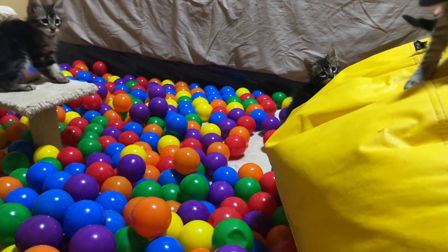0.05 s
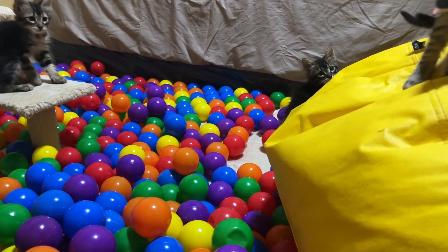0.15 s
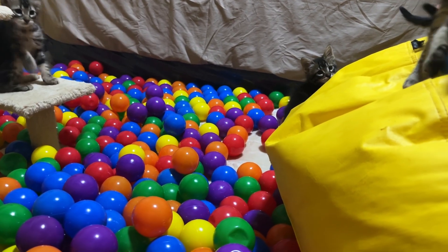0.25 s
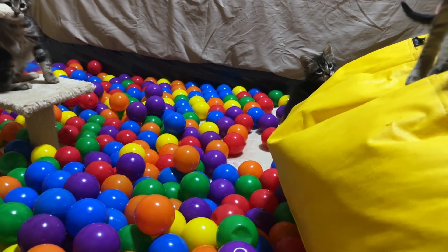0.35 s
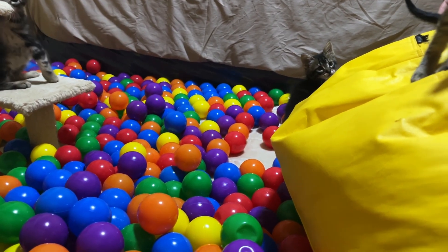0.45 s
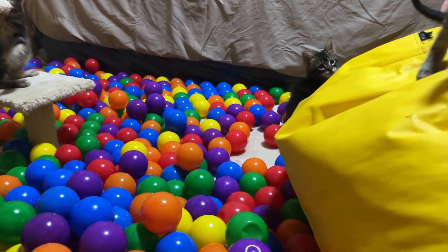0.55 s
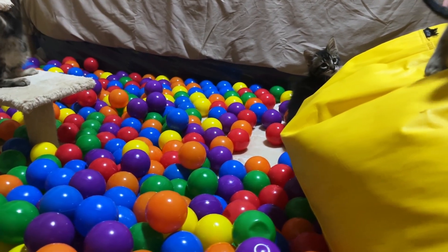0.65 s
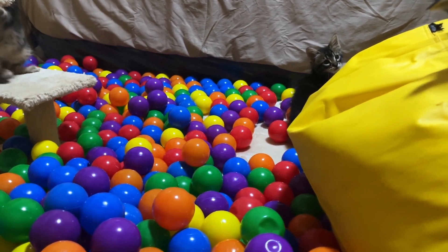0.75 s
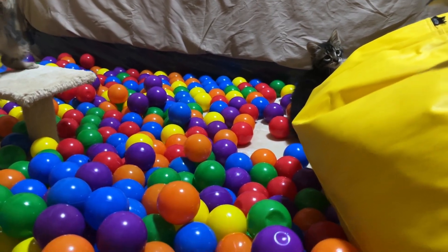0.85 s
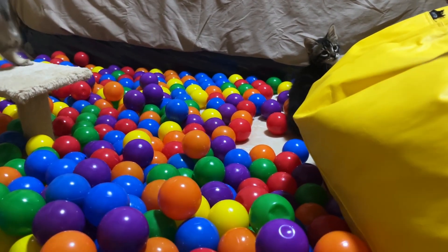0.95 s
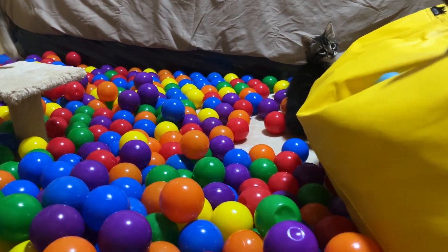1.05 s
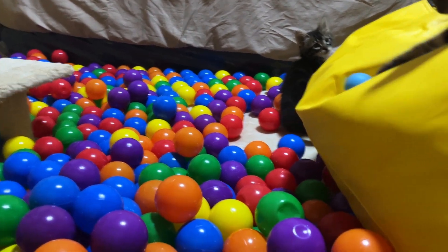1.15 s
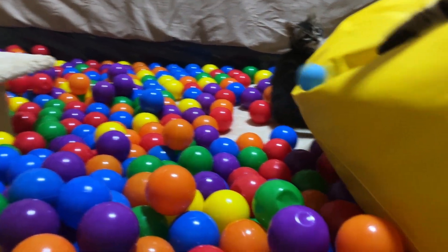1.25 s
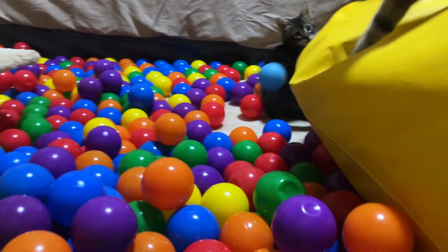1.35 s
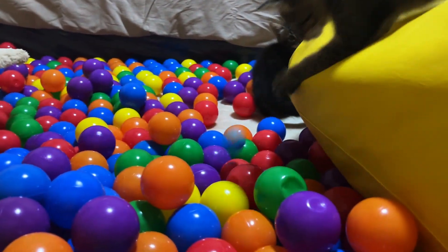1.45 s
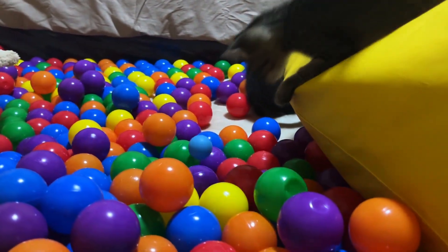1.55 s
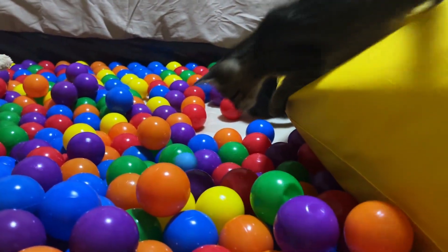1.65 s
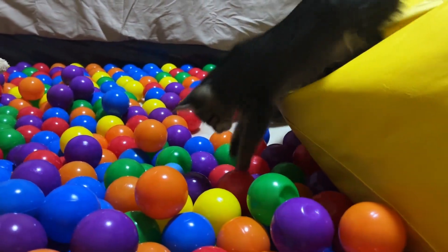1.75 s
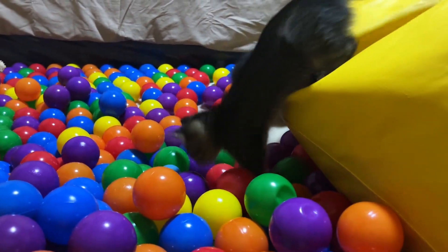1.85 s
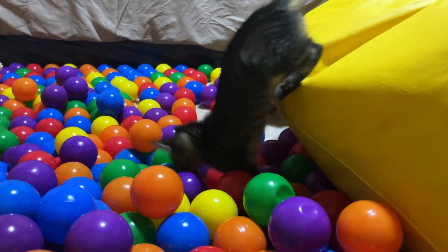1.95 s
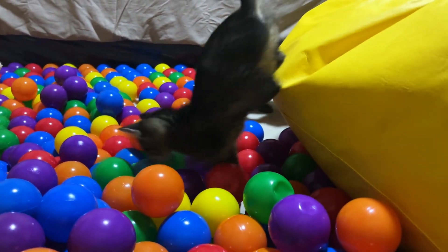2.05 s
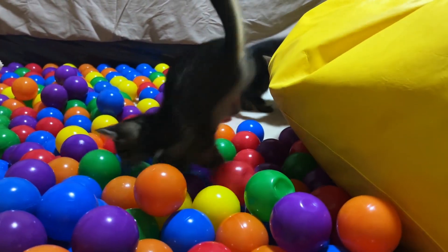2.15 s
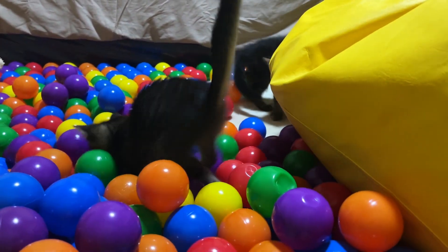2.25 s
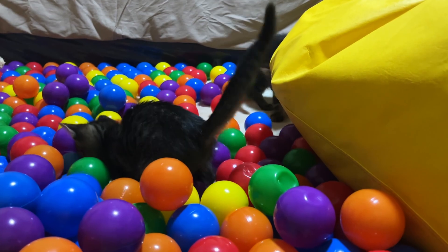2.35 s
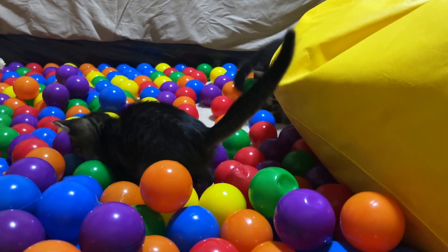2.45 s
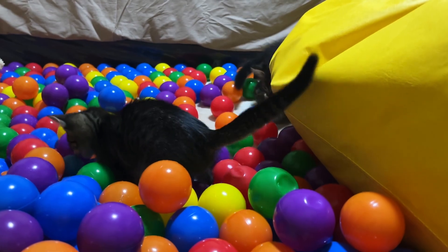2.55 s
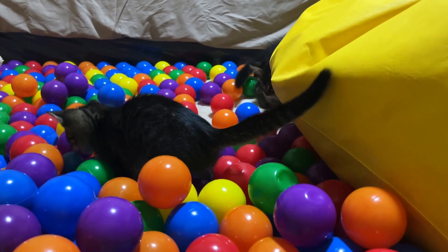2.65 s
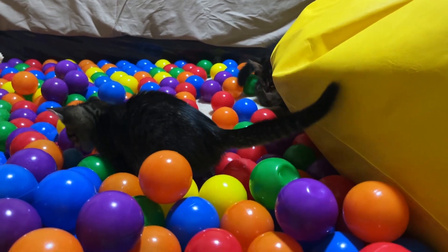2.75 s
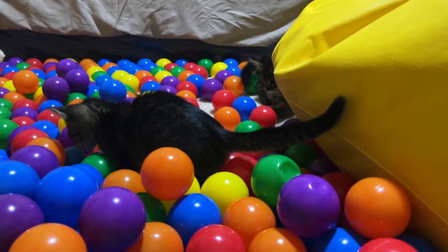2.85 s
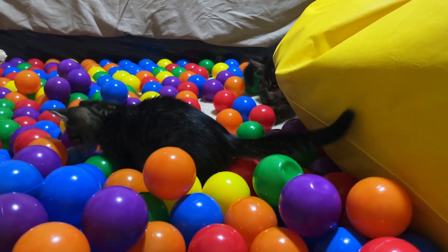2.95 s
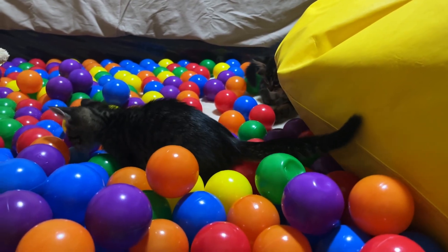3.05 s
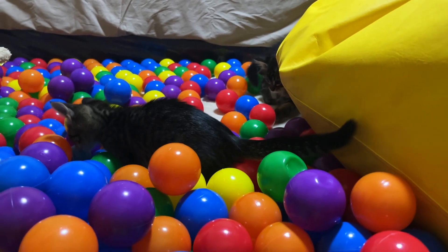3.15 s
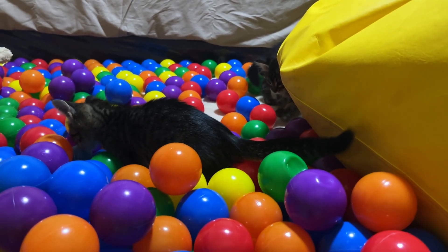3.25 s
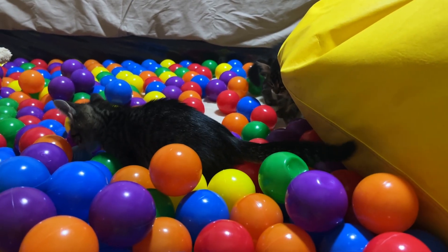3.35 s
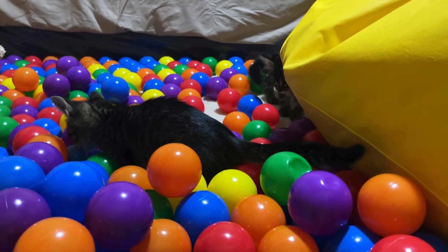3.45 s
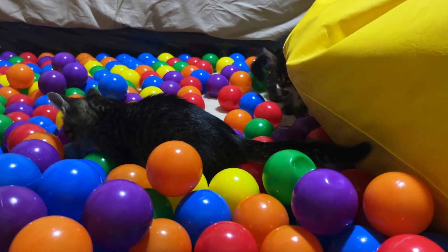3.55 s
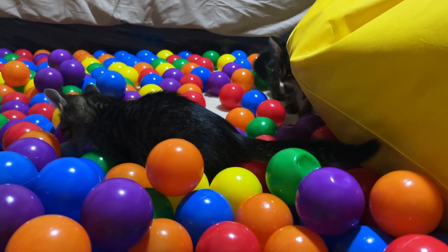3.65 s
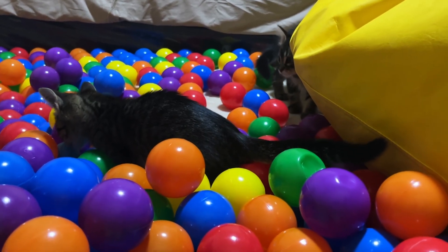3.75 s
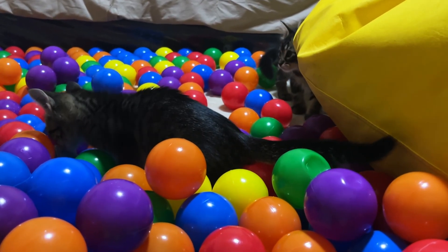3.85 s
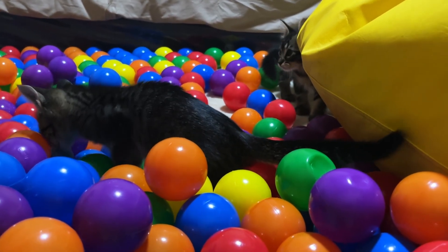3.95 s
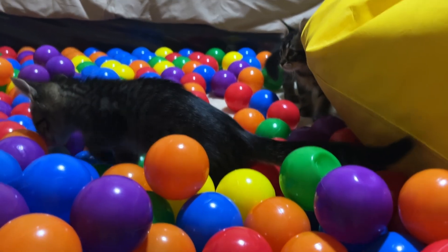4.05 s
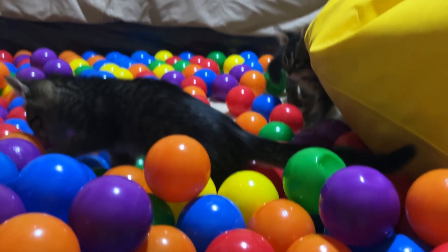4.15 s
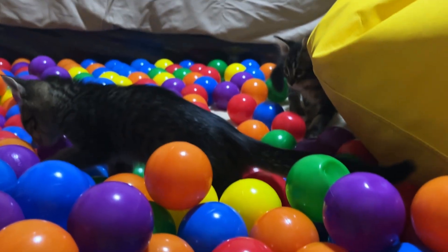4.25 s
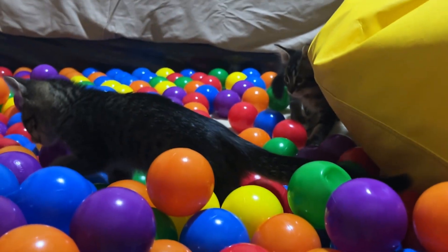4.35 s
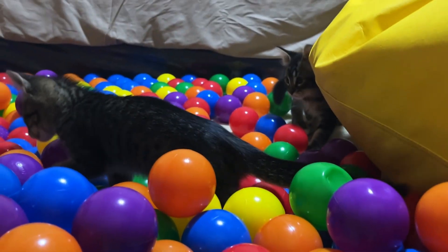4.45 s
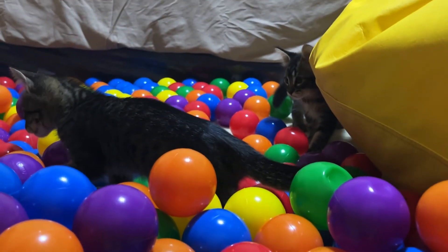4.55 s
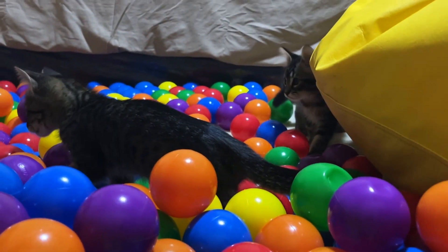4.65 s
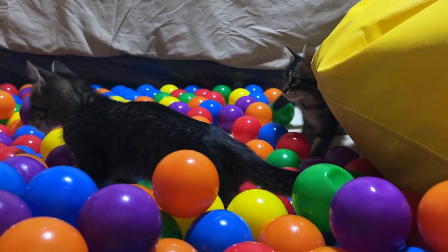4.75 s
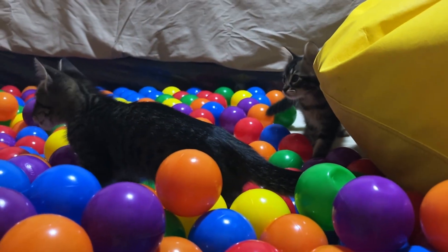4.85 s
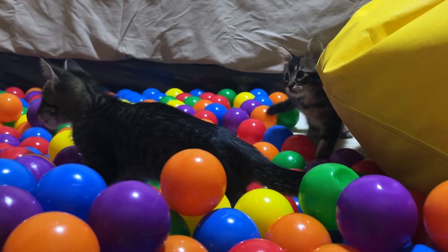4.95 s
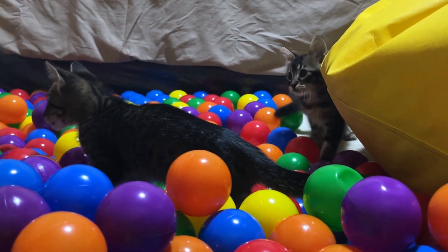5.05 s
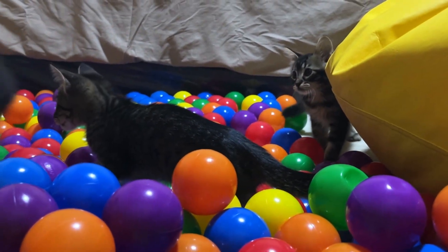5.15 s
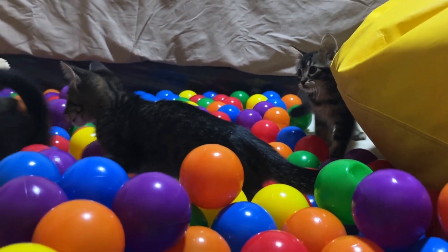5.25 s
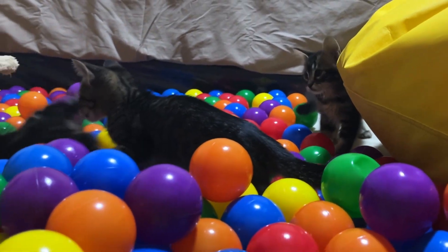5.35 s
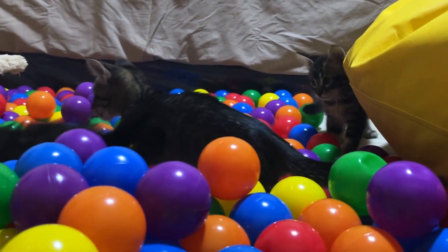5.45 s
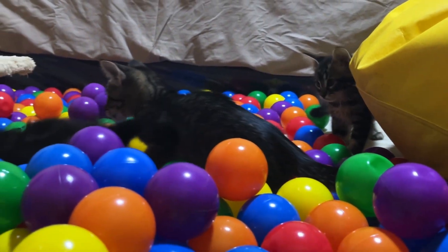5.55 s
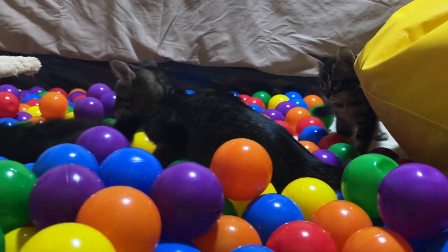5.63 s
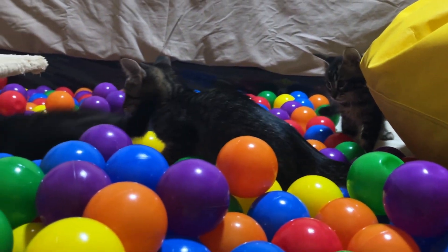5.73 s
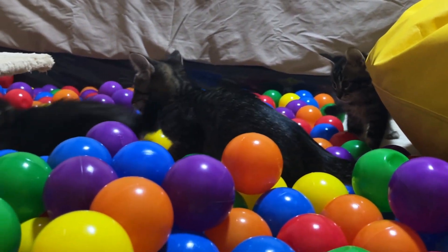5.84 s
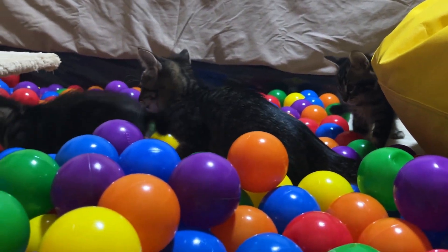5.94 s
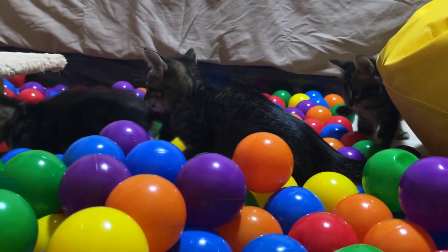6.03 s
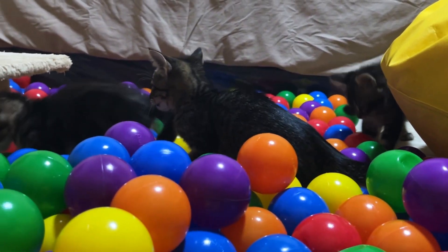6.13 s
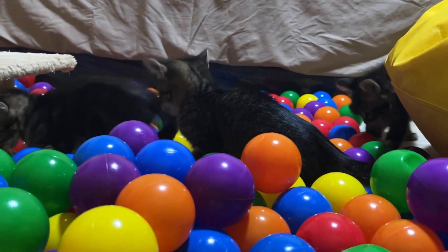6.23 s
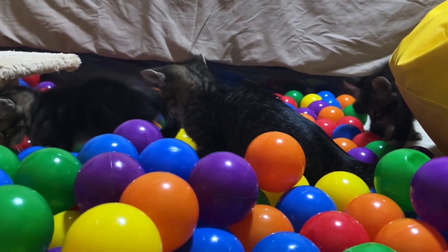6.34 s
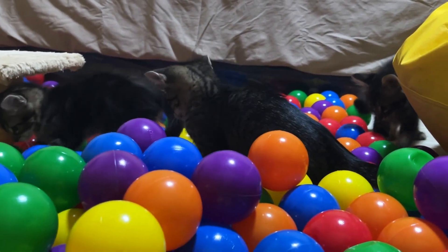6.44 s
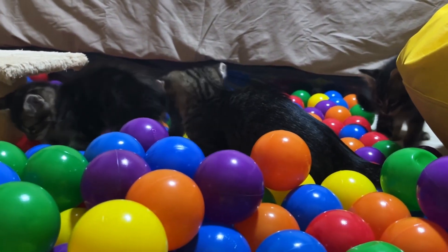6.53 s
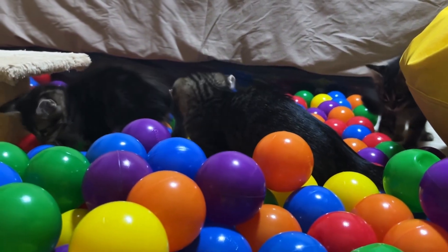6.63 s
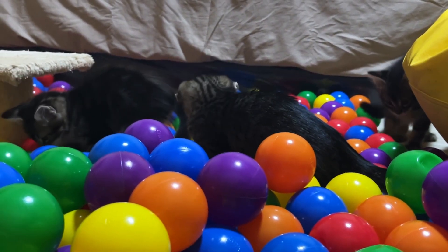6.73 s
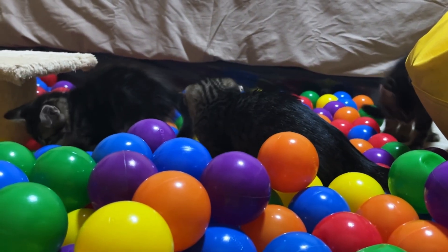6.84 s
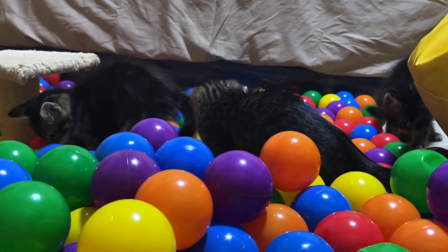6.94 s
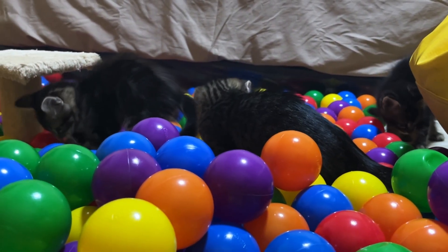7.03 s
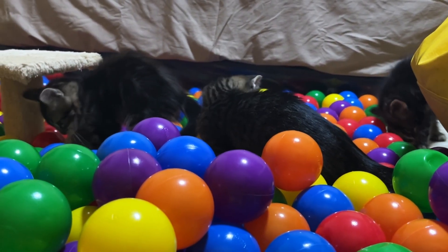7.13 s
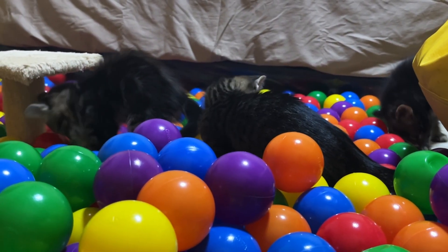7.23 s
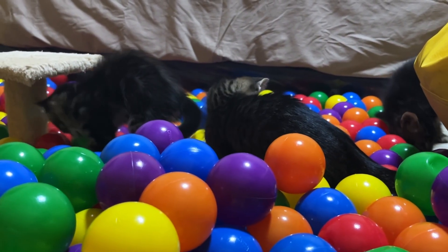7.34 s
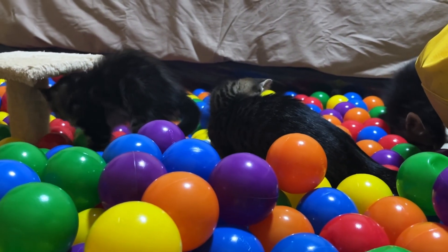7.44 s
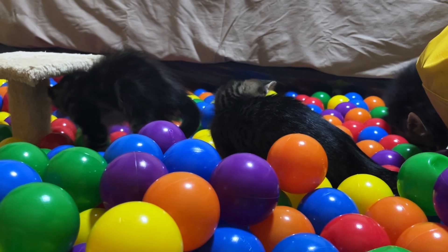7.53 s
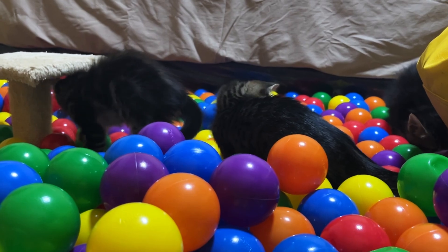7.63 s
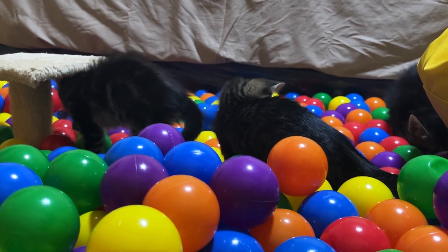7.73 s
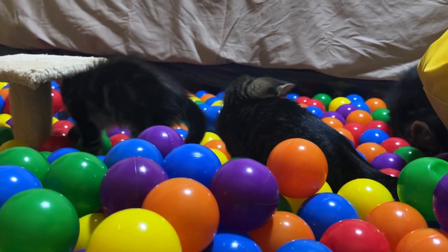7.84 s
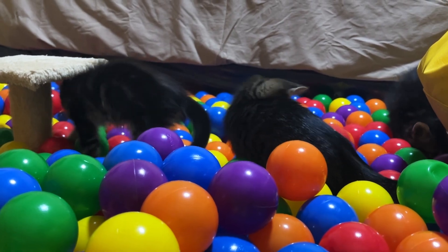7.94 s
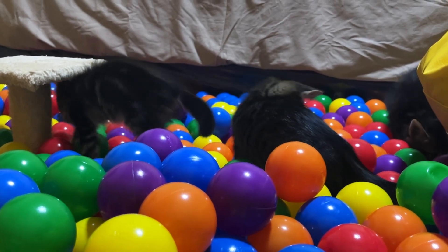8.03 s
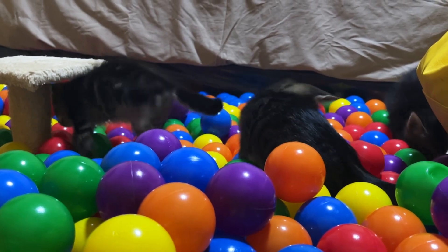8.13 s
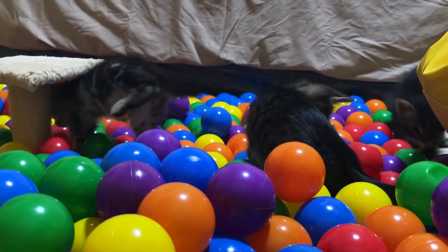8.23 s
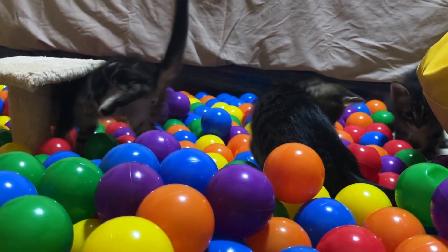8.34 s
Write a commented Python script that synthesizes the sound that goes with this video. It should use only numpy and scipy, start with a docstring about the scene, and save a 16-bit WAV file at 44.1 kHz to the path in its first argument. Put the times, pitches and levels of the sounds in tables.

```python
"""Thin hollow plastic balls knock together as kittens wade through a pit of them in a small soft room, heard close.
Each knock is a dull dent of the shell, a short shell ring, air singing near 3 kHz and a treble tick.
Clear knocks, loudest at 1.5 s, stand out of a clatter of random knocks and shaped noise for rubbing fur and cloth.
Low dying sines are thumps: floor jolts and, near 5.25 s, a long hollow thump. Ringing slips are scrapes;
the room adds short tails and a steady hush."""
import sys
import numpy as np
from scipy import signal
from scipy.fft import rfft, irfft, next_fast_len
from scipy.io import wavfile
from scipy.ndimage import uniform_filter1d

SR = 44100
rng = np.random.default_rng(int(sys.argv[2]) if len(sys.argv) > 2 else 0)


def store_pcm(level_fs):
    """Save levels as 16-bit WAV."""
    pcm = np.round(np.clip(level_fs, -1, 1) * 32767).astype(np.int16)
    wavfile.write(sys.argv[1], SR, np.atleast_2d(pcm).T)


N = 369999

# Clear knocks. Each row: time in seconds, dent level in dB, dent pitch in Hz, shell level in dB, strongest shell
# ring in Hz, air level in dB, strongest air ring in Hz, room feed in dB (far knocks are wet).
CLEAR_KNOCKS = [(0.372, -44, 510, -42.5, 1260.0, -53.5, 2860, 11.0),
                (0.411, -29.5, 540, -36, 840, -43, 2860, 3.5),
                (0.545, -44.5, 475.0, -40.5, 750, -55, 2520, 9),
                (0.591, -30.0, 400, -41, 1230.0, -69, 2670, 1),
                (0.656, -25, 406, -36.5, 980.0, -62, 2750, 4),
                (0.709, -18.5, 370.0, -28.5, 890, -46, 4220, -2.5),
                (0.775, -26, 430, -23, 1836, -33.5, 2380, 2.5),
                (0.79, -23.5, 480, -25.5, 1065, -48, 2340, 2.0),
                (0.829, -25.5, 460, -26.5, 1460, -37, 2360, 3.5),
                (1.081, -31.5, 490, -41, 810, -57.5, 3700, 7),
                (1.123, -29.5, 388, -40.5, 775.0, -50.0, 3600, 3),
                (1.163, -28.5, 426, -33.5, 1470, -52.5, 2890, 0.5),
                (1.226, -28.5, 320, -27.5, 930, -33, 2860, 4),
                (1.244, -31.5, 313.0, -29.0, 2180, -35, 2600, -2.5),
                (1.276, -27.5, 414.0, -27, 1090, -36.5, 3920, -7.5),
                (1.374, -19.5, 430, -28, 796, -51.5, 2360, 1.5), (1.5, -1, 660, 1.5, 844, -5.0, 2780, -11),
                (1.548, -18, 620, -21, 1660.0, -27.5, 2700, -7),
                (1.659, -10, 585, -12.5, 867.0, -25.5, 3500, -5),
                (1.686, -23, 626, -16.5, 850, -22.5, 3270, -2),
                (1.766, -21, 726, -22, 2030, -27.5, 2920, -17),
                (1.787, -22.5, 386, -24, 1160, -34, 3540, 4),
                (1.845, -26, 402.0, -20.5, 1740, -15.5, 2760, 1),
                (1.854, -16, 474, -14.5, 880, -18.5, 3000, -1.5),
                (1.932, -24.5, 740, -18.0, 760, -25.5, 2660, 4),
                (1.952, -16.0, 434, -16.5, 1260, -28, 2670, -3),
                (2.056, -22.0, 406, -28.5, 2180, -24, 2550, -1),
                (2.069, -21, 490, -28, 1760, -26.5, 2660, -1.5),
                (2.088, -19.5, 410, -28, 1770.0, -32.5, 3700, -7),
                (2.136, -21.5, 364, -24, 770.0, -23, 2570, 1),
                (2.173, -22.5, 484.0, -37.5, 845.0, -27.5, 3030, -5.5),
                (2.19, -20, 445, -29, 1700, -19.5, 3340, -4.5),
                (2.227, -17.5, 600.0, -23, 780, -22, 2690, -4.5),
                (2.251, -17.5, 517, -25, 940.0, -26, 3650, 1),
                (2.268, -18, 390.0, -29, 910.0, -30.5, 3080, -3.0),
                (2.295, -17.5, 363, -25, 1710, -15.5, 2850, 2.5),
                (2.308, -12.0, 362, -24, 910, -23.5, 3340, 4.5),
                (2.322, -12.5, 530, -21, 1760, -21, 3630, -2),
                (2.39, -15, 492, -25.0, 760.0, -26.5, 2850, -0.5),
                (2.539, -42, 386, -46, 1325, -42, 2835, 3),
                (2.596, -34.5, 464, -42, 1320.0, -38, 3350, -2.5),
                (2.628, -33.5, 428.0, -39.5, 960.0, -30.5, 3060, -10.5),
                (2.803, -38.5, 455.0, -55, 930.0, -50.5, 3610, -8),
                (3.157, -49, 530.0, -55, 914.0, -52.5, 4330, -1.5),
                (3.244, -47.5, 483.0, -66.5, 781.0, -77.0, 2665, 6),
                (3.746, -44.5, 259.5, -48.5, 1420.0, -77, 2373, 6.5),
                (3.905, -46.0, 400.0, -65.0, 1493, -57, 2946, -4.5),
                (4.029, -39.5, 470, -48, 2113, -61.0, 2540, 3.0),
                (4.048, -36, 450.0, -46.5, 1238, -48.0, 2660, -4),
                (4.06, -30.5, 315, -52, 990.0, -55, 2725, -4),
                (4.143, -36.5, 288.0, -59, 2100.0, -57.0, 2680, -5.0),
                (4.251, -32, 486, -38.5, 865.0, -48.5, 3340, 3.5),
                (4.275, -24.5, 563, -27.0, 805, -38.5, 2480, 5),
                (4.433, -38, 446.0, -70.5, 804.0, -51.5, 4080, 0),
                (4.687, -46.5, 349, -53, 1504, -59, 2530, 3.5), (4.81, -25.5, 450, -29, 1170, -53, 2500, 3),
                (4.949, -27.5, 486, -31, 1150, -57, 2660, 1),
                (4.987, -23.5, 328, -25, 1080, -32.5, 3060, 6.5),
                (5.126, -26.5, 422, -25, 1270, -20.5, 2840, 0),
                (5.173, -22.5, 550, -29, 850, -28.5, 2900, -3),
                (5.225, -33, 376, -28.5, 814.0, -50.0, 3050, -14),
                (5.244, -6.5, 457, -24, 844.0, -47, 2850, 2),
                (5.327, -25.5, 500, -23.5, 1900, -24.5, 2760, 0),
                (5.359, -9, 575, -13, 1056.0, -49, 2900, -25),
                (5.433, -15.5, 535, -28, 2030.0, -32.5, 3810, -1.5),
                (5.463, -19.5, 606, -34.0, 770.0, -30.0, 2940, -13),
                (5.509, -23.5, 490, -69, 1000.0, -38, 2440, 1),
                (5.532, -25, 590, -32, 950.0, -32, 2890, 10),
                (5.627, -19.5, 463, -55, 799.0, -34, 2800, -10),
                (5.782, -24.5, 560, -51, 1150.0, -38, 2700, 0.5),
                (5.796, -25, 416, -50, 1000.0, -46.0, 2540, -6),
                (5.823, -12, 424, -36, 759.0, -47, 2900, -10),
                (5.851, -24, 400.0, -48, 900.0, -36.0, 2900, 3.5),
                (5.931, -17, 390, -40, 764.0, -36.5, 3370, -4.5),
                (5.957, -42, 400.0, -40.5, 1340, -36.5, 2690, 1),
                (5.974, -26.5, 550, -41, 1090, -45.5, 3730, -14),
                (6.22, -36, 426.0, -42, 1110.0, -42.5, 2740, 0.5),
                (6.333, -35.0, 424, -34.5, 2124, -40, 2350, 0.5),
                (6.433, -38, 420, -36.0, 2050, -43, 2830, 5.0),
                (6.485, -33, 590.0, -35, 1930, -47.0, 2730, -14),
                (6.511, -27.5, 512, -33.5, 1005, -38, 2830, -1),
                (6.676, -42.0, 540, -64.5, 1290, -68, 2515, -9),
                (6.778, -44, 397, -52, 1000.0, -46, 2940, 5),
                (6.871, -42, 415, -51.5, 1055, -51.5, 3160, 2.5),
                (7.308, -36, 459, -50.5, 1015, -42, 2860, 6.5),
                (7.496, -39.0, 359.0, -46, 1570, -53, 3380, 3),
                (7.536, -37.5, 353, -51, 1090, -55, 3620, 9.5),
                (7.572, -25.5, 408, -31, 1150, -37.5, 3240, -1),
                (7.598, -30.5, 514, -37.5, 836.0, -38.5, 3230, -2.5),
                (7.786, -55.0, 450.0, -58.5, 1200.0, -68, 2614, 9),
                (7.827, -20.5, 463, -21.5, 1200, -24.5, 2740, 2),
                (7.891, -27.0, 400, -28, 1080, -32, 2420, 0.0),
                (7.919, -42, 496.0, -25, 1104.0, -32.5, 3240, -4),
                (7.998, -26.5, 533, -21, 1130, -28, 3225, -3),
                (8.053, -31.5, 468.0, -22.5, 1136, -31.5, 3380, -4.5),
                (8.097, -31.5, 294.0, -29, 1050.0, -41.5, 3700, -9),
                (8.375, -40, 490, -54.5, 885.0, -65, 3290, 1.5)]
# Stirring of the heap. Each row: time in seconds, effort in dB, crispness (enclosed air over dents) in dB.
STIRRING = [(0.0, -52, -20), (0.1, -65, 0.5), (0.2, -65.5, -14.5), (0.3, -65, -2.5), (0.36, -60, -9),
            (0.56, -58, -13), (0.77, -36.5, -18.5), (0.93, -57, -1), (1.22, -42, -13), (1.35, -48, -11),
            (1.6, -40.5, -6.5), (1.65, -43, -2), (1.72, -31, -10), (1.79, -40, -5.5), (1.85, -31, -8),
            (1.94, -34, -9.5), (1.99, -43, -5), (2.05, -45.5, -4), (2.181, -35.5, -7), (2.272, -32.5, -3),
            (2.41, -63, -10.5), (2.55, -55.5, -3), (2.72, -59, -6), (2.83, -69.5, -10), (3.529, -70.5, -15),
            (3.67, -57, -14), (3.801, -64, -13.5), (3.95, -66, -10.5), (4.06, -67.5, -5), (4.18, -69, -13),
            (4.37, -52, -16), (4.449, -62.5, -9.5), (4.56, -66, -13), (4.742, -66.5, -12.5),
            (4.86, -45.5, -20), (5.05, -44, -10), (5.18, -45, -10.5), (5.25, -33.5, -9), (5.328, -26, -7),
            (5.45, -35, -7), (5.64, -41, -5.5), (5.74, -50, -5), (5.8, -48.5, -6.5), (5.864, -39.5, -5),
            (6.0, -75, -1.5), (6.179, -64, -9.5), (6.3, -62, -3.5), (6.501, -56, -6), (6.62, -67, -8),
            (6.82, -64.5, -4), (7.201, -74.5, -8), (7.5, -71.5, 5), (7.75, -77.5, -6), (8.0, -60.5, 6.5),
            (8.15, -58.5, -2), (8.39, -68.5, -7)]
# Treble ticks. Each row: time in seconds, level over the air ring in dB.
TICK_OVER_AIR = [(0.0, -6.5), (0.3, -2.5), (0.45, -2.5), (0.9, -2.5), (1.5, -5), (1.6, -8), (1.9, -10.5),
                 (2.5, -6), (2.65, -12.5), (2.9, -7), (4.25, -8), (4.38, -14), (4.43, 7), (4.5, 2.5),
                 (4.56, -8), (4.9, -9), (5.1, -4.5), (5.4, -9.5), (6.4, -10), (6.6, -8), (7.3, -12.5),
                 (8.0, -4.5), (8.39, -10)]
# Low thumps: floor jolts, and near 5.25 s a long hollow thump. Each row: start in seconds, level before the soft
# start in dB, swing in Hz, t60 in seconds.
LOW_THUMPS = [(0.701, -37, 100.7, 0.066), (0.791, -35, 114, 0.22), (0.832, -47, 101, 0.27),
              (1.23, -45, 40, .06), (1.5, 1, 38, 0.03), (1.662, -32, 60, .04), (3.801, -42, 118, 0.08),
              (5.245, -16, 236.5, 0.24), (5.258, -15.5, 285, 0.089), (5.931, -52, 49.7, 0.032)]
# One ball scrapes along another and sings. Each row: start in seconds, length in seconds, lower ring level in dB,
# lower ring in Hz, upper ring level in dB, upper ring in Hz.
BALL_SCRAPES = [(0.913, 0.1, -74, 1870, -59, 2680), (1.672, 0.053, -32.5, 1550, -42, 3480),
                (3.64, 0.087, -62, 1430, -70, 2500), (4.001, 0.046, -59, 1970, -55, 2600),
                (4.039, 0.052, -58, 1890, -53, 2666), (5.249, 0.1, -46, 1900, -35, 2840),
                (5.758, 0.087, -55, 1720, -45, 2770), (7.569, 0.078, -54.5, 1166, -47.5, 3250),
                (7.922, 0.046, -50, 1130, -48, 3800)]
# Shell modes of one ball. Each row: pitch in Hz, relative level in dB, t60 in seconds.
SHELL_MODES = [(855, 4.5, 0.0098), (1140, 3, 0.016), (1490, 0.5, 0.012), (1890, 3.5, 0.011),
               (2242, -9.5, 0.012)]
# Modes of the air in one ball. Each row: pitch in Hz, relative level in dB, t60 in seconds.
AIR_MODES = [(2630, 2, 0.034), (3020, -5.5, 0.012), (3550, 1, 0.027), (3901, 1.5, 0.0071),
             (4450, -6, 0.011), (4800, -11.5, 0.0025)]
# Spectrum of the contact spot's dense modes. Each row: frequency in Hz, relative level in dB.
TICK_SPECTRUM = [(4600, -0.5), (5400, 1), (6700, -3), (9300, -7), (11500, -6), (15000, -9)]
# Colour of the rubbing. Each row: frequency in Hz, relative level in dB.
RUB_SPECTRUM = [(40, -55), (100, -30), (220, -11.5), (450, 6), (1000, 1), (2000, 2), (2900, 7), (4300, -1),
                (5200, 9.5), (10000, -0.5), (15000, -7.5)]
# Colour of the room's quiet. Each row: frequency in Hz, relative density in dB per Hz.
HUSH_SPECTRUM = [(18, -49), (30, -19.5), (124, 2.5), (499, -10), (1130, -19), (1390, -18.5), (4650, -29),
                 (7090, -35.5), (8300, -52.5), (10800, -45), (16000, -54)]
# Room decay. Each row: frequency in Hz, t60 in seconds.
ROOM_T60 = [(200, 0.23), (600, 0.24), (1500, 0.28), (4000, .28), (10000, 0.17)]
# Left-right likeness of the diffuse sound. Each row: frequency in Hz, likeness from 0 to 1.
LIKENESS = [(300, 0.93), (640, 0.47), (1400, 0.31), (3100, 0.94), (6800, 1), (15000, 1)]
# Phase offset of the ports. Each row: frequency in Hz, lead of the left port in radians.
LEFT_LEAD = [(300, 0.2), (520, 0.5), (1300, 0.1), (2000, 0.4), (2900, 0.9), (4300, 0.5), (5300, 0.1),
             (5800, -1.2), (6800, -1.6), (8100, -3.1), (9800, -4.5), (11500, -6.2), (12500, -6.4),
             (13300, -7.6), (15300, -9.4)]
# Colour of the left port. Each row: frequency in Hz, level of left over right in dB.
LEFT_OVER_RIGHT = [(300, 1.5), (1000, -1), (3500, 5), (7000, 2.5), (14000, -1.5)]
# Microphone colour. Each row: frequency in Hz, gain in dB.
MICROPHONE_GAIN = [(30, -20.5), (150, -3), (230, 2.5), (1000, 4), (3000, 0), (5000, 0.5), (8500, 1.5),
                   (12000, 2.5), (15500, 0.5)]
# Edges in Hz between the rubbing bands that follow dents, shells, air and ticks.
BAND_EDGES_HZ = [750, 2200, 4500]

RING_S = np.arange(768) / SR  # time axis of one ring
DENT_T60_S, SHELL_T60_S, AIR_T60_S, TICK_T60_S = 0.022, 0.023, 0.02, 0.0046  # shell, air: strongest rings
BALL_PITCH_SPREAD, STRIKE_SPREAD_DB = 0.083, 1.6  # standard deviations: pitch share, level of each mode
KNOCK_LAG_S = 0.0015  # every knock sounds this long after its written time
SHELL_MODES_DB, AIR_MODES_DB = -4.0, -3.5  # mode sets against the knock's shell and air levels
STRONGEST_SHELL_DB, STRONGEST_AIR_DB = -1.0, -0.5
HARD_DB = 4  # a full-force blow drives the upper rings so much harder
CRUMPLE_DB, CRUMPLE_S = 13, 0.004  # a full-force blow is damped by so much more after so long
REBOUND_MAX = 0.42
DELAY_S_PER_DB = 0.000008  # right port's delay per dB of left over right
FAR_T60_S, FAR_DB = 0.025, 3.5  # the heap muffles the lesser rings on the way to the walls
FAR_SHELL_SHARE, FAR_AIR_SHARE = 0.92, 0.82  # of the strongest rings; the air ring is muffled too
KNOCK_TICK_DB, DRY_TICK_DB_PER_DB = -4.5, 0.23  # near knocks are drier and brighter
KNOCK_PAN_DB, PAN_HALF_RANGE_DB = -0.3, 7.0  # left over right
CLATTER_PER_S, CLATTER_SPREAD_DB, CLATTER_ROOM_DB = 360, 3, -3.5
CRISP_SHELL_DB, CRISP_SHELL_SHARE = -0.5, 0.63  # shells take a share of the crispness
RUB_DB, PATCH_DB, GRIT_DB, GRIT_S = -3.0, 2.5, 1.5, 0.0047  # rubbing catches and slips
HUSH_DB = -68.5
SLIPS_PER_S, SCRAPE_T60_S, SCRAPE_SAG = 540, 0.035, 0.047  # sag: share by which the rings sink
SCRAPE_ROOM_DB = -14.5  # a scrape is near: little of it comes back from the walls
LONG_WAVE_HZ = 170  # well below this the ports are treated alike
BAND_LIMIT_HZ = 16150


def gain_of(db):
    """Amplitude factor for a level in dB."""
    return 10 ** (np.asarray(db) / 20)


def evened(x):
    """Scales x to an RMS of 1."""
    return x / np.sqrt(np.mean(x ** 2) + 1e-20)


def read(points, hz):
    """Reads a table over frequency, linear in log frequency."""
    table_hz, value = np.transpose(points)
    return np.interp(np.log(hz + 1), np.log(table_hz + 1), value)


def add(mix, start_s, sound):
    """Adds sound to mix in place, cut at the end."""
    part = mix[..., round(start_s * SR):][..., :sound.shape[-1]]
    part += sound[..., :part.shape[-1]]


def shaped(x, gain):
    """Multiplies the spectrum of x by gain(hz)."""
    size = next_fast_len(N + 4096)
    spectrum = rfft(x, size) * gain(np.fft.rfftfreq(size, 1 / SR))
    return irfft(spectrum, size)[..., :N]


def apart(hz):
    """0 for long waves, which reach both ports alike, 1 for short ones."""
    return 1 - np.exp(-(hz / LONG_WAVE_HZ) ** 2)


def ring(db, hz, t60_s, rise_s):
    """A dying sine with a soft start."""
    envelope = gain_of(-60 * RING_S / t60_s) * (1 - np.exp(-RING_S / rise_s))
    return gain_of(db) * np.sin(2 * np.pi * hz * RING_S) * envelope


def noise(db_field):
    """Two unrelated noises of a given level over frequency and time."""
    z = rng.standard_normal((db_field.shape[1], 257, 2, 2)).T
    spectra = (z[0] + 1j * z[1]) * gain_of(db_field)
    return signal.istft(spectra, nperseg=512, noverlap=384)[1][:, :N]


def hush():
    """The steady quiet of the room: stationary coloured noise."""
    hz = np.fft.rfftfreq(512, 1 / SR)
    field = read(HUSH_SPECTRUM, hz)[:, None] + np.zeros(N // 128 + 5)
    return gain_of(HUSH_DB) * evened(noise(field))


def stirring(t):
    """Levels of dents, shells, enclosed air and ticks at times t: effort plus crispness."""
    s, effort_db, crisp_db = np.transpose(STIRRING)
    effort = np.interp(t, s, effort_db)
    crisp = np.interp(t, s, crisp_db)
    shell = CRISP_SHELL_DB + CRISP_SHELL_SHARE * crisp
    tick = crisp + np.interp(t, *np.transpose(TICK_OVER_AIR))
    return effort + np.array([0 * t, shell, crisp, tick])


def rubbing():
    """Fur, cloth and balls slide past each other: patchy noise that follows the stirring."""
    t = np.arange(N // 128 + 5) * 128 / SR
    hz = np.fft.rfftfreq(512, 1 / SR)
    band = np.searchsorted(BAND_EDGES_HZ, hz)
    per_bin_db = -10 * np.log10(np.bincount(band)[band])  # shares a band's power among its bins
    effort_db = uniform_filter1d(stirring(t)[band] + per_bin_db[:, None], size=3, axis=0)
    patches = rng.standard_normal((len(t), len(hz))).T
    patches = uniform_filter1d(patches, size=6, axis=0)
    patches = evened(uniform_filter1d(patches, size=12, axis=1))
    grit = evened(uniform_filter1d(rng.standard_normal(N), size=round(GRIT_S * SR)))
    field = effort_db + read(RUB_SPECTRUM, hz)[:, None] + PATCH_DB * patches + RUB_DB
    return gain_of(GRIT_DB * grit) * noise(field)


def clatter():
    """Rows of small random knocks: mostly soft, a few hard, each of its own colour."""
    chance = rng.random((round(CLATTER_PER_S * N / SR), 5))
    colour = rng.standard_normal((len(chance), 5))
    s = chance[:, 0] * N / SR
    blow_db = CLATTER_SPREAD_DB * np.minimum(-np.log(chance[:, 1] + 1e-9), 2.2)
    # dent, shell, air, tick
    spread_db = np.array([[4.0], [2.5], [2.2], [2.2]])
    offset_db = np.array([[-3.0], [-1.5], [-2.5], [-9.5]])
    dent, shell, air, tick = stirring(s) + blow_db + spread_db * colour[:, :4].T + offset_db
    dent_hz = 240 * 2.8 ** chance[:, 2]
    shell_hz = 800 * 2.0 ** chance[:, 3]
    air_hz = 2550 * 1.8 ** chance[:, 4] ** 1.3
    pan_db = 1.2 + 10.0 * colour[:, 4]
    wet_db = CLATTER_ROOM_DB + 0 * s
    return np.transpose([s, dent, dent_hz, shell, shell_hz, air, air_hz, tick, pan_db, wet_db])


def clear_knocks():
    """Full rows for the clear knocks: the tick follows the air ring, the side is chance."""
    s, dent_db, dent_hz, shell_db, shell_hz, air_db, air_hz, wet_db = np.transpose(CLEAR_KNOCKS)
    tick_db = air_db + np.interp(s, *np.transpose(TICK_OVER_AIR)) + KNOCK_TICK_DB - DRY_TICK_DB_PER_DB * wet_db
    pan_db = KNOCK_PAN_DB + PAN_HALF_RANGE_DB * (2 * rng.random(len(s)) - 1)
    return np.transpose([s, dent_db, dent_hz, shell_db, shell_hz, air_db, air_hz, tick_db, pan_db, wet_db])


def jostle(rows, count=5, span_s=0.14, first_db=-16.0, fall_db=17.0, pitch_spread=0.13):
    """A clear knock shoves the neighbouring balls: a dying run of knocks of other pitches."""
    rows = np.repeat(np.array(rows, float), count, axis=0)
    late = rng.random(len(rows))
    other = rng.standard_normal((len(rows), 7))
    rows[:, 0] += 0.012 + span_s * late ** 1.5
    run_db = first_db + rows[:, -1] - fall_db * late  # wetter knocks have louder runs
    rows[:, [1, 3, 5, 7]] += run_db[:, None] + 6.0 * other[:, :4]
    rows[:, [2, 4, 6]] *= np.exp(pitch_spread * other[:, 4:])
    return rows


def tick_modes(count=32):
    """The contact spot's many short modes under one spectrum."""
    hz = np.geomspace(TICK_SPECTRUM[0][0], TICK_SPECTRUM[-1][0], count)
    return np.transpose([hz, read(TICK_SPECTRUM, hz), TICK_T60_S + 0 * hz])


def ball_rings(modes, rise_s, count=48):
    """Summed modes of many slightly unlike balls, each struck at another spot, peak 1."""
    hz, db, t60_s = np.transpose(modes)[:, None, :, None]
    tune, strike, side = rng.standard_normal((count, len(modes), 3)).transpose(2, 0, 1)[..., None]
    each = ring(db + STRIKE_SPREAD_DB * strike, hz * (1 + BALL_PITCH_SPREAD * tune), t60_s, rise_s)
    rings = (np.sign(side) * each).sum(1)
    return rings / abs(rings).max(1, keepdims=True)


def knocks(rows, balls):
    """Each knock dents one ball, rings its shell, air and contact spot, and rebounds once; left, right, room feed."""
    s, dent_db, dent_hz, shell_db, shell_hz, air_db, air_hz, tick_db, pan_db, wet_db = np.transpose(rows)[..., None]
    which, side, wait, rebound = rng.random((len(rows), 4)).T
    force = gain_of(shell_db)
    shell, air, tick = gain_of(HARD_DB * force) * balls[:, (which * balls.shape[1]).astype(int)]

    sound = np.sign(side - 0.5)[:, None] * ring(dent_db, dent_hz, DENT_T60_S, 0.0011)
    sound += gain_of(tick_db) * tick
    sound += gain_of(shell_db + SHELL_MODES_DB) * shell
    sound += gain_of(air_db + AIR_MODES_DB) * air
    strongest_air = ring(air_db + STRONGEST_AIR_DB, air_hz, AIR_T60_S, 0.0004)
    strongest_shell = ring(shell_db + STRONGEST_SHELL_DB, shell_hz, SHELL_T60_S, 0.0011)

    crumple = gain_of(-CRUMPLE_DB * force * (RING_S / CRUMPLE_S) ** 2)
    muffle = gain_of(FAR_DB - 60 * RING_S / FAR_T60_S)
    far = crumple * (muffle * (sound + FAR_AIR_SHARE * strongest_air) + FAR_SHELL_SHARE * strongest_shell)
    near = crumple * (sound + strongest_shell + strongest_air)
    bounce = REBOUND_MAX * rebound * crumple[:, round(CRUMPLE_S * SR)]  # a crumpled ball hardly rebounds

    left, right, wet = gain_of(np.array([pan_db / 2, -pan_db / 2, wet_db]))
    start_s = s[:, 0] + KNOCK_LAG_S
    out = np.zeros((3, N))
    for k, at in enumerate(start_s):
        add(out[0], at, left[k] * near[k])
        add(out[1], at + DELAY_S_PER_DB * pan_db[k, 0], right[k] * near[k])
        add(out[2], at, wet[k] * far[k])
        both = np.array([left[k], right[k]]) * near[k]
        add(out[:2], at + 0.002 + 0.006 * wait[k], -bounce[k] * both)
    return out


def low_thumps():
    """Floor jolts and a long hollow thump: low dying sines, alike in both ports."""
    out, t = np.zeros(N), np.arange(8000) / SR
    for s, db, hz, t60_s in LOW_THUMPS:
        envelope = gain_of(db - 60 * t / t60_s) * (1 - np.exp(-t / 0.0033))
        add(out, s, envelope * np.sin(2 * np.pi * hz * t))
    return out


def scrapes():
    """Uneven slips ring the same two modes, sinking in pitch, while the stroke swells and fades."""
    out = np.zeros(N)
    for s, length_s, low_db, low_hz, high_db, high_hz in BALL_SCRAPES:
        chance = rng.random((SR // 4, 2))[:round(length_s * SR)]
        slips = (chance[:, 0] < SLIPS_PER_S / SR) * (chance[:, 1] - 0.5)
        slips = evened(slips) * np.hanning(len(chance))
        early = np.linspace(1, 0, len(slips))
        for share, tune in [(early, 1 + SCRAPE_SAG / 2), (1 - early, 1 - SCRAPE_SAG / 2)]:
            modes = np.zeros(len(RING_S))
            for db, hz in [(low_db, low_hz), (high_db, high_hz)]:
                mode = ring(0, hz * tune, SCRAPE_T60_S, 0.001)
                modes += gain_of(db) * mode / np.linalg.norm(mode)
            add(out, s, signal.oaconvolve(slips * np.sqrt(share), modes))
    return out


def room(x, turns_per_s=1.7):
    """Tails of sparse taps of random sign, each band dying at its own speed; x shifts between three places."""
    size = SR // 2
    taps = np.zeros((6, size))
    at = np.arange(100, size - 20, 20) + rng.integers(0, 20, (6, (size - 101) // 20))
    np.put_along_axis(taps, at, rng.choice([-1., 1.], at.shape), 1)
    taps *= 1 - np.exp(-(np.arange(size) / SR / 0.0078) ** 3)  # the walls answer after some milliseconds
    hz, t, z = signal.stft(taps, SR, nperseg=256)
    decay = gain_of(-60 * t / read(ROOM_T60, hz)[:, None])
    tail = signal.istft(z * decay, SR, nperseg=256)[1]
    tail = tail.reshape(2, 3, -1) / np.linalg.norm(tail[0])  # two outputs, three places
    turn = turns_per_s * np.arange(N) / SR + np.arange(3)[:, None] / 3
    place = np.sqrt(2 / 3) * np.cos(np.pi * turn)
    return signal.oaconvolve((x * place)[None], tail, axes=2).sum(1)[:, :N]


def scene():
    """Direct knocks, scrapes and thumps, and diffuse sound that the two ports share only in part."""
    balls = np.array([ball_rings(SHELL_MODES, 0.000079),
                      ball_rings(AIR_MODES, 0.00072),
                      ball_rings(tick_modes(), 0.0012)])
    clear = clear_knocks()
    *direct, reflected = knocks(np.vstack([clear, jostle(clear), clatter()]), balls)
    direct = shaped(np.array(direct), apart)  # small balls send out no long waves
    scraped = scrapes()
    tails = room(reflected + gain_of(SCRAPE_ROOM_DB) * scraped)
    left, unlike = tails + rubbing() + hush()

    def same(hz):
        return 1 - apart(hz) * (1 - np.clip(read(LIKENESS, hz), 0, 1))

    right = shaped(left, same) + shaped(unlike, lambda hz: np.sqrt(1 - same(hz) ** 2))
    return direct + scraped + np.array([left, right]) + low_thumps()


def record(dry):
    """Microphone colour, the offset between the ports, overload at full scale, the band limit."""
    def right_port(hz):
        return gain_of(read(MICROPHONE_GAIN, hz))

    def left_port(hz):
        level = gain_of(apart(hz) * read(LEFT_OVER_RIGHT, hz))
        return right_port(hz) * level * np.exp(1j * apart(hz) * read(LEFT_LEAD, hz))

    clipped = np.clip([shaped(dry[0], left_port), shaped(dry[1], right_port)], -1, 1)
    low_pass = signal.firwin(511, BAND_LIMIT_HZ, window=("kaiser", 9), fs=SR)
    return signal.oaconvolve(clipped, low_pass[None], "same")


dry = scene()
out = record(dry)
store_pcm(out)
```